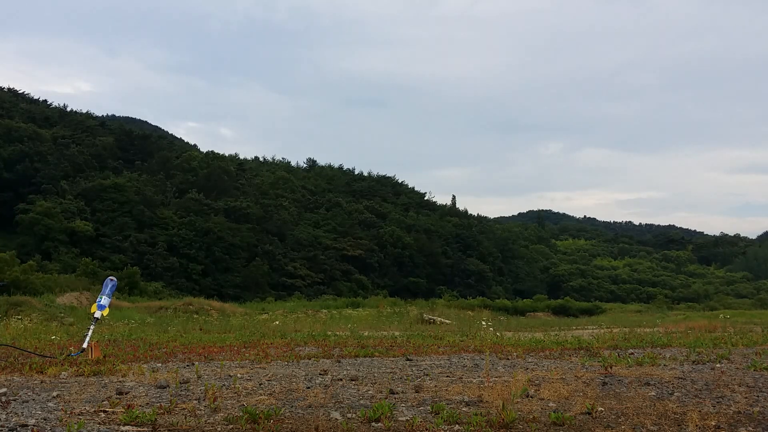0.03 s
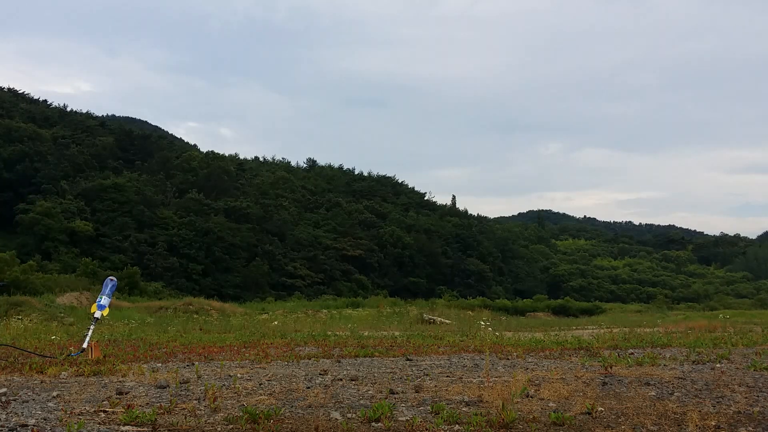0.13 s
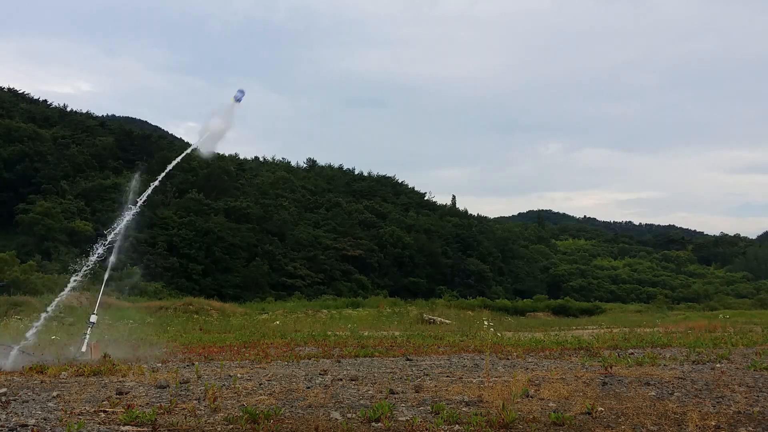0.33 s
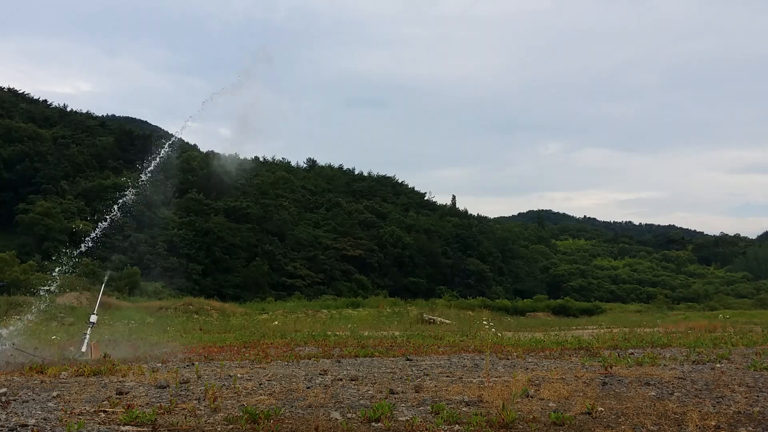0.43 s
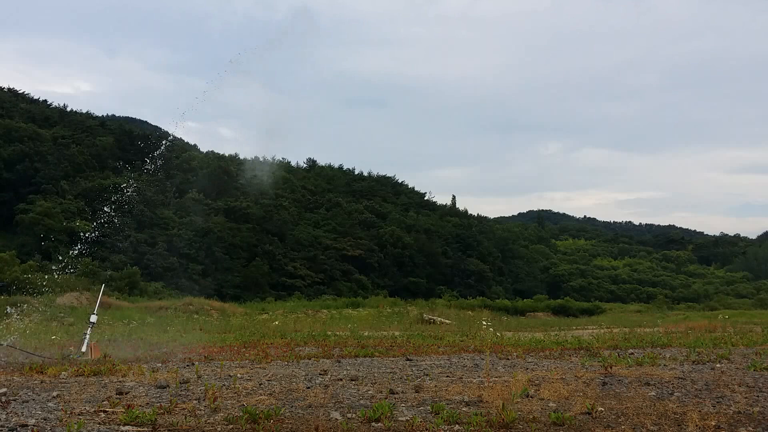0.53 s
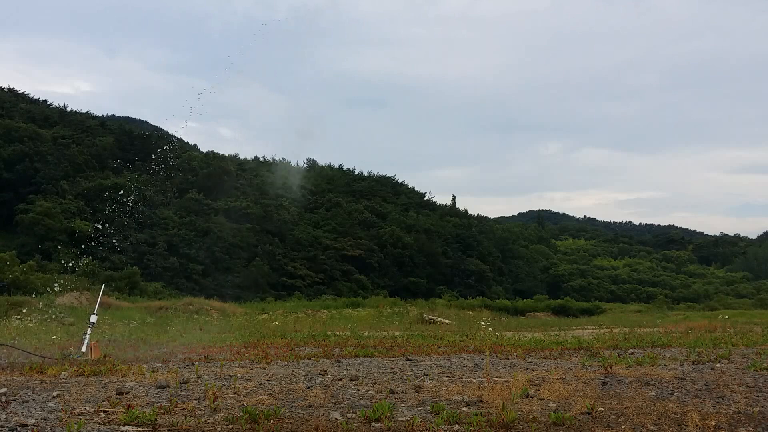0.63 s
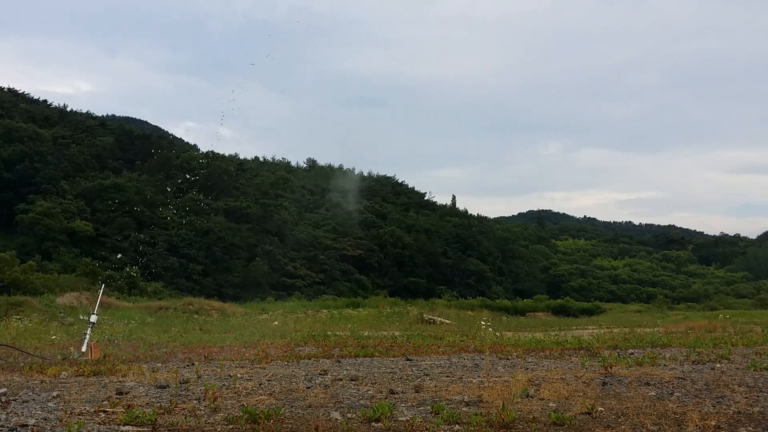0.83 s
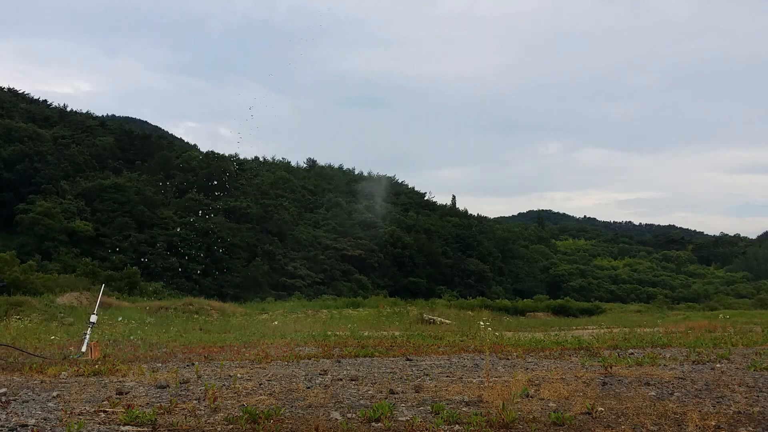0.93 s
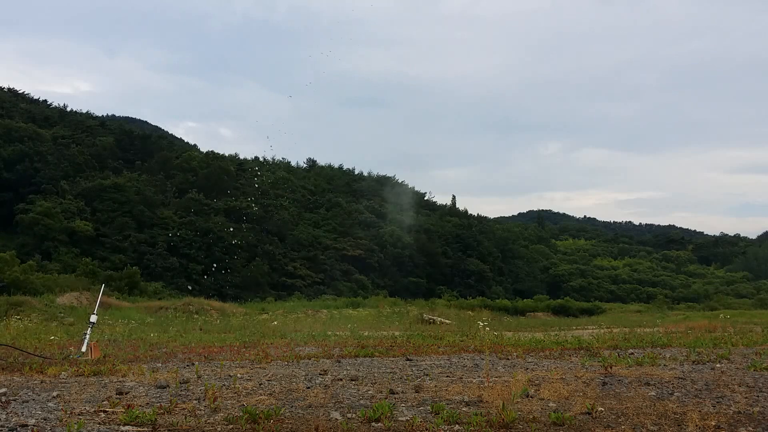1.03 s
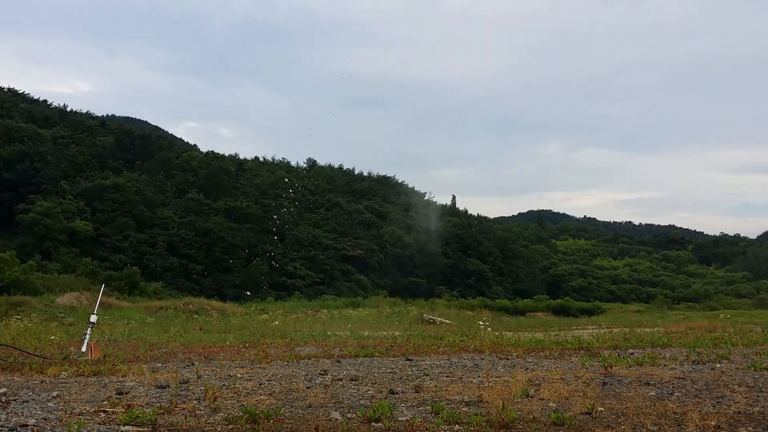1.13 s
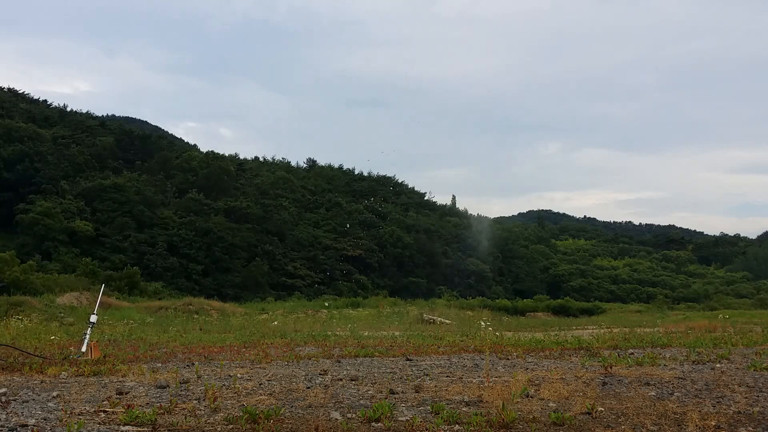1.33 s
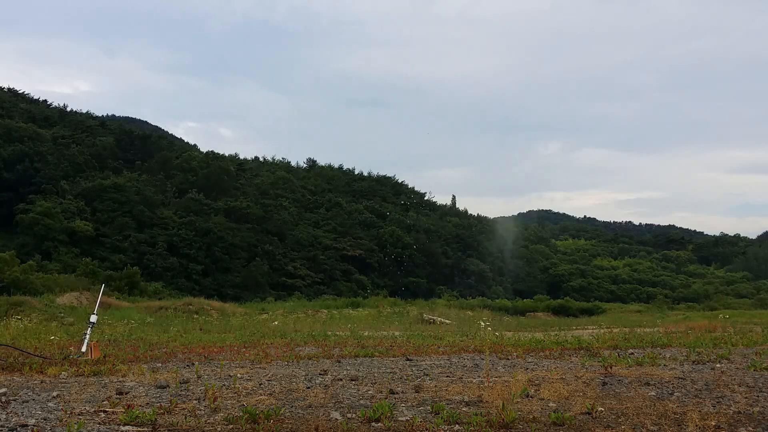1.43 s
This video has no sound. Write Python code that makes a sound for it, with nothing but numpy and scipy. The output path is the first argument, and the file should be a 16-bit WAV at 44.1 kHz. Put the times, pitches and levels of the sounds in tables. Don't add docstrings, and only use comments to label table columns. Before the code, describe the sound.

After a brief quiet of light wind and insects, a water rocket snaps loose and blasts away in a hiss; spray fades quickly into the open field, with low wind thuds buffeting the nearby stereo microphone.

```python
import sys
import numpy as np
from scipy import signal
from scipy.fft import rfft, irfft, next_fast_len
from scipy.io import wavfile
from scipy.ndimage import map_coordinates

SR = 44100
rng = np.random.default_rng(int(sys.argv[2]) if len(sys.argv) > 2 else 0)


def materialize(psi):
    bounded = np.clip(np.atleast_2d(psi).T, -1, 1)
    quanta = np.round(bounded * 32767).astype(np.int16)
    wavfile.write(sys.argv[1], SR, quanta)


def level_to_linear(level):
    exponent = np.asarray(level, float) / 20
    return 10 ** exponent


N = 66150
TIME_S = np.arange(N) / SR


def since(start_s):
    return np.maximum(TIME_S - start_s, 0)


def unit(x):
    return x / np.sqrt(np.mean(x ** 2) + 1e-20)


def along(points, hz):
    f, v = np.transpose(points)
    return np.interp(np.log(hz + 1), np.log(f + 1), v)


def curve(points):
    s, v = np.transpose(points)
    return np.interp(TIME_S, s, v)


def wobble(rate_hz):
    knots = rng.standard_normal(int(N * rate_hz / SR) + 4)
    return map_coordinates(knots, [np.arange(N) * rate_hz / SR])


def filtered(x, response):
    m = next_fast_len(N + 8192)
    return irfft(rfft(x, m) * response(np.fft.rfftfreq(m, 1 / SR)), m)[..., :N]


def shaped(x, spectrum):
    return unit(filtered(x, lambda hz: level_to_linear(along(spectrum, hz))))


def noise(spectrum, channels=1):
    return shaped(rng.standard_normal((channels, N)), spectrum)


def peak(hz, centre_hz, width_hz):
    return 1j * hz * width_hz / (centre_hz ** 2 - hz ** 2 + 1j * hz * width_hz)


def panned(left_over_right_db):
    return level_to_linear(np.array([[left_over_right_db / 2], [-left_over_right_db / 2]]))


def arrive(x, lead_s):
    return filtered(x, lambda hz: np.exp(1j * np.pi * hz * lead_s * np.array([[1], [-1]])))


def wide(spectrum):
    scatter_db, scatter_hz = -5, 6500
    own = filtered(noise(spectrum, channels=2),
                   lambda hz: level_to_linear(scatter_db) * hz ** 4 / (hz ** 4 + scatter_hz ** 4))
    return unit(noise(spectrum) + own)


def whiff(s, length_s, db, centre_hz, width_hz):
    tone = filtered(rng.standard_normal(N), lambda hz: peak(hz, centre_hz, width_hz) ** 2)
    return level_to_linear(db) * np.exp(-((TIME_S - s) / length_s) ** 2) * unit(tone)


def air():
    # [f/Hz, level/dB per Hz]
    rustle = [(150, -4), (300, 1), (700, -5.5), (1500, -10.5), (2500, -11), (6000, -12), (9500, -21),
              (15800, -16.5)]
    # [f/Hz, correlation]
    likeness = [(60, -0.097), (240, 0.41), (950, 0.25), (3770, 0.0071), (15000, -0.24)]
    # [t/s, level/dB]
    breeze = [(0, -59.5), (.3, -57.5), (.7, -64), (1.05, -65), (1.35, -57.5), (1.5, -59.5)]

    def mid_side(hz):
        turn = np.arccos(np.clip(along(likeness, hz), -1, 1)) / 2
        return np.array([np.cos(turn), np.sin(turn)])

    mid, side = filtered(noise(rustle, channels=2), mid_side)
    return level_to_linear(curve(breeze) + 2.1 * wobble(11.95)) * np.array([mid + side, mid - side])


def insects():
    # [t/s, level/dB]
    swell = [(0, -56.5), (.2, -53), (.6, -63), (1.06, -61.5), (1.3, -56.5), (1.5, -54)]
    # [f/Hz, level/dB per Hz]
    sizzle = [(3500, -58), (5000, -10), (6000, 1.5), (6600, 2.5), (7400, -7), (8500, -7.5), (10000, -37)]
    # [f/Hz, level/dB per Hz]
    buzz = [(6500, -53), (7600, 7), (8100, 14), (8700, -18), (10000, -30)]
    # [t/s, length/s, level/dB]
    chirps = [
        (-.03, 0.078, -67),
        (1.196, 0.094, -68),
    ]
    level_db = curve(swell)
    left = level_to_linear(level_db + 0.67 * wobble(39.9)) * level_to_linear([[0], [-27]]) * noise(sizzle, channels=2)
    right = level_to_linear(level_db - 12 + 2.0 * wobble(30.7)) * level_to_linear([[-6], [0]]) * noise(buzz, channels=2)
    gate, ramp_s = np.zeros(N), .015
    for s, length_s, db in chirps:
        gate += level_to_linear(db) * np.clip(np.minimum(TIME_S - s, s + length_s - TIME_S) / ramp_s, 0, 1)
    cricket = gate * np.sin(2 * np.pi * 3315 * TIME_S + 0.49 * wobble(59.6))
    return left + right + panned(-1) * cricket


def wind():
    # [f/Hz, level/dB per Hz]
    rumble = [(12, -60), (20, -3), (80, -0.5), (118, -6.5), (173, -8), (288, -25.5), (449, -32.5),
              (500, -25.5), (650, -62), (1100, -120)]
    # [t/s, level/dB]
    gust = [(0, 2), (.5, 0), (.9, -1), (1.05, -6), (1.15, 0), (1.5, 1)]
    # [t/s, peak level/dB, f/Hz, length/s]
    left_puffs = [(0.024, -36.5, 72.5, 0.03), (0.054, -42.5, 92, 0.088), (0.09, -29.5, 108.6, 0.023),
                  (0.13, -35, 84, 0.015), (0.175, -35.5, 79, 0.018), (0.199, -34.5, 94, 0.0077),
                  (0.399, -34, 97, 0.008), (0.437, -44, 88, 0.016), (0.464, -39.5, 97, 0.012),
                  (0.491, -42, 93, 0.028), (0.531, -43, 105, 0.0089), (0.608, -28.5, 127.6, 0.013),
                  (0.632, -34.5, 124, 0.0066), (0.679, -33.5, 90.5, 0.022), (0.717, -39, 142, 0.0088),
                  (0.887, -35, 113, 0.014), (1.133, -36.5, 92, 0.009), (1.235, -43, 82.5, 0.017),
                  (1.332, -34.5, 77, 0.022), (1.363, -38, 80.4, 0.013), (1.408, -34.5, 106, 0.021),
                  (1.45, -32.5, 58.6, 0.016)]
    # [t/s, peak level/dB, f/Hz, length/s]
    right_puffs = [(0.102, -42, 98, 0.031), (0.149, -34, 91, 0.011), (0.188, -42.5, 121, 0.018),
                   (0.394, -42, 99, 0.016), (0.692, -48, 66, 0.027), (0.801, -41.5, 104, 0.03),
                   (0.893, -45, 83, 0.012), (0.951, -42, 85, 0.015), (1.006, -48, 77, 0.017),
                   (1.189, -41, 86, 0.02), (1.478, -44.5, 75.5, 0.035)]
    wind_db, lump_db, lump_rate_hz, puff_rough_db = -53, 4, 7.94, -7.5
    lumps = level_to_linear(lump_db * np.array([wobble(lump_rate_hz), wobble(lump_rate_hz)]))
    rough = level_to_linear(puff_rough_db) * noise(rumble, channels=2)
    puffs = np.zeros((2, N))
    for port, rows in enumerate((left_puffs, right_puffs)):
        for s, db, hz, length_s in rows:
            u = TIME_S - s
            thud = np.cos(2 * np.pi * hz * u + np.pi * (.5 + rng.random())) + rough[port]
            puffs[port] += level_to_linear(db) * np.exp(-2 * (u / length_s) ** 2) * thud
    return puffs + level_to_linear(wind_db + curve(gust)) * unit(lumps * noise(rumble, channels=2))


def taps():
    # [t/s, level/dB, f/Hz, left over right/dB]
    blips = [(1.174, -48, 960, -7), (1.26, -48, 398, -7), (1.284, -41, 390, -4), (1.359, -44, 910, -8),
             (1.374, -52, 900, -8), (1.445, -35.5, 530, -2), (.716, -43, 244, 19.5),
             (0.883, -43.5, 234, 12.5), (0.226, -34.5, 101.5, 9), (0.265, -33.5, 90, 10),
             (0.297, -33.5, 80, 10.5), (0.352, -28, 90, -3), (0.288, -26, 190, -2), (0.445, -44, 290, 0),
             (0.1, -50, 280, 6)]
    cycles, out = 1.58, np.zeros((2, N))
    for s, db, hz, pan_db in blips:
        turns = since(s) * hz
        envelope = (1 - np.exp(-8 * turns)) * np.exp(-2 * turns / cycles)
        out += panned(pan_db) * level_to_linear(db) * np.sin(2 * np.pi * turns) * envelope
    return out


def ticks():
    # [t/s, level/dB]
    drops = [(.387, -30), (.5172, -41), (.546, -43), (0.5602, -41), (0.5612, -42), (.589, -43), (.596, -46),
             (.663, -45.5), (1.376, -52)]
    # [f/Hz, level/dB per Hz]
    spectrum = [(2000, -12), (4300, 2), (9000, -3.5), (12000, -10), (15800, -18)]
    t60_s = .012
    envelope = sum(level_to_linear(db - 60 * since(s) / t60_s) * (TIME_S > s) for s, db in drops)
    return envelope * noise(spectrum)


def flare():
    # t/s, length/s, level/dB, f/Hz, width/Hz
    swell = (.55, .018, -50, 800, 260)
    return whiff(*swell)


def whistle():
    # t/s, length/s, level/dB, f/Hz, width/Hz
    swell = (.32, .007, -37, 3050, 260)
    return whiff(*swell)


def hum():
    # [t/s, level/dB]
    fly_off = [
        (.492, -62),
        (.503, -51),
        (.55, -45.5),
        (.585, -50.5),
        (.61, -67.5),
    ]
    # [f/Hz, width/Hz, level/dB]
    bottle = [(572, 148, 2), (740, 340, -8), (339.5, 85, -6)]
    tone = filtered(rng.standard_normal(N),
                    lambda hz: sum(level_to_linear(db) * peak(hz, c, w) ** 2 for c, w, db in bottle))
    sounding = (TIME_S > fly_off[0][0]) * (TIME_S < fly_off[-1][0])
    return unit(tone) * level_to_linear(curve(fly_off) + 1.5 * wobble(50.8)) * sounding


def blast():
    # [peak t/s, level/dB, rise/s, fall/s], each time to -10 dB
    swells = [
        (.358, -22, .019, .013),
        (.363, -21, .012, .013),
    ]
    # [f/Hz, level/dB per Hz]
    roar = [(80, -23), (300, -2), (430, 1), (750, -14), (1000, -7.5), (1300, -10), (1800, 0), (2300, -4),
            (3500, -14), (8000, -27)]
    # [f/Hz, level/dB per Hz]
    hiss = [(800, -13), (2000, -8.5), (4500, -1.5), (6500, -7.5), (8500, -10.5), (11000, -10), (15800, -31)]
    ragged_db, out = 2, 0
    for (s, db, rise_s, fall_s), spectrum in zip(swells, (roar, hiss)):
        u = TIME_S - s
        bell_db = -10 * (np.abs(u) / np.where(u < 0, rise_s, fall_s)) ** 2
        out = out + level_to_linear(db + bell_db + ragged_db * wobble(350)) * wide(spectrum)
    return out


def jet():
    # [t/s, flow/dB]
    flow_points = [(.222, -61), (.232, -37), (.29, -33.5), (.312, -33.5), (.345, -32), (.41, -36.5),
                   (.46, -44.5), (.58, -47.5), (.66, -54)]
    # [f/Hz, level/dB per Hz]
    spray_spectrum = [(150, -5), (400, -1.5), (1500, -5), (3500, -3.5), (6500, 0.5), (8500, -5),
                      (11000, -11), (15800, -9.5)]
    # [f/Hz, level/dB per Hz]
    splash = [(120, -25), (300, 1.5), (800, -2.5), (1500, -15), (3000, -21), (5000, -33)]
    fade_db_per_s, drops_per_s, drops_share, drop_spread_db = 19, 3000, 0.22, 3
    splash_db, splash_end_s, splash_fall_s = -38.5, 0.297, 0.0055
    spread_s, spread_takes_s, lead_s = .32, .05, .000155

    fade_db = fade_db_per_s * since(flow_points[-1][0])
    flow = level_to_linear(curve(flow_points) - fade_db + 0.95 * wobble(91.5))
    sizes = level_to_linear(drop_spread_db * np.minimum(rng.exponential(size=(2, N)), 2))
    drops = (rng.random((2, N)) < drops_per_s / SR) * rng.standard_normal((2, N)) * sizes
    crackle = shaped(drops, spray_spectrum)
    hiss = noise(spray_spectrum, channels=2)
    spray = np.sqrt(1 - drops_share) * hiss + np.sqrt(drops_share) * crackle

    slap_db = splash_db + 1.9 * wobble(72.5) - 10 * since(splash_end_s) / splash_fall_s
    slap = level_to_linear(slap_db) * (TIME_S > flow_points[1][0]) * noise(splash)
    fan = np.clip((TIME_S - spread_s) / spread_takes_s, 0, 1) * np.pi / 2
    point = flow * np.cos(fan) * spray[0] + slap
    return flow * np.sin(fan) * spray + arrive(point, lead_s)


def click():
    s, db, width_s = .26478, -7, .00004
    return level_to_linear(db) * np.exp(-((TIME_S - s) / width_s) ** 2)


def crack():
    # [t/s, level/dB]
    pops = [
        (.245, -9),
        (.2643, 0),
    ]
    # [f/Hz, level/dB, t60/s, delay/s]
    modes = [(6400, 15, .0024, .0001), (720, -11, .012, .0004), (390, -7, .018, 0)]
    rise_s, out = .0012, np.zeros(N)
    for s, pop_db in pops:
        for hz, db, t60_s, delay_s in modes:
            u = since(s + delay_s)
            ring = np.sin(2 * np.pi * hz * u) * (1 - np.exp(-u / rise_s))
            out += level_to_linear(pop_db + db - 60 * u / t60_s) * ring
    return out


def snaps():
    # [t/s, level/dB, t60/s, thump over snap/dB]
    bursts = [(.228, -32, .2, -12), (.2318, -18, .012, -26), (.2356, -16, .016, -24), (.245, -9, .004, -20),
              (.2472, -17, .012, -10), (.254, -26, .04, -12), (.2644, -6, .004, -14),
              (.2658, -14, .035, -14), (.2722, -20, .012, -18), (.2845, -27, .012, -8), (.334, -36, .012, 6),
              (.341, -34, .012, 6), (.3588, -13, .006, -10)]
    # [f/Hz, level/dB per Hz]
    spectrum = [(150, -2), (1200, -15), (2700, -11), (3200, -20), (4000, -20), (4500, 0.5), (6000, -3.5),
                (8500, 0), (15800, -9.5)]
    rise_s, thump_hz, thump_width_hz, thump_t60_s = .0004, 560, 930, 0.023
    bright, push = np.zeros(N), np.zeros(N)
    for s, db, t60_s, thump_db in bursts:
        u = since(s)
        bright += level_to_linear(db - 60 * u / t60_s) * (1 - np.exp(-u / rise_s))
        push += level_to_linear(db + thump_db + 14.5 - 60 * u / thump_t60_s) * (u > 0)
    thump = filtered(push * rng.standard_normal(N),
                     lambda hz: peak(hz, thump_hz, thump_width_hz) ** 2)
    return bright * wide(spectrum) + thump


def field(x):
    # [f/Hz, left over right/dB]
    lean = [(300, -3), (2500, -1.5), (3600, 0), (4500, 1.5), (6500, 7), (7500, -3.5), (8500, -11.5),
            (11000, -4.5), (14000, -1)]
    tail_db, t60_s = -27, .15
    t = np.arange(SR // 4) / SR
    tail = rng.standard_normal((2, len(t))) * level_to_linear(-60 * t / t60_s)
    tail /= np.linalg.norm(tail[0])
    wet = x + level_to_linear(tail_db) * signal.fftconvolve(x, tail, axes=1)[:, :N]
    return filtered(wet, lambda hz: panned(along(lean, hz)[None, :]).reshape(2, -1))


def scene():
    stand_lead_s, airborne_lead_s = .000137, .000073
    background = air() + insects() + wind() + taps()
    near = ticks() + flare() + whistle() + click()
    rocket = arrive(snaps() + crack(), stand_lead_s) + arrive(blast() + hum(), airborne_lead_s) + jet()
    return background + near + field(rocket)


def low_pass(x):
    return signal.sosfilt(signal.butter(12, 15750, fs=SR, output="sos"), x)


def record(dry):
    low_hz, top_hz = 35, 15750
    mix = filtered(dry, lambda hz: (hz < top_hz) * 1j * hz / (low_hz + 1j * hz))
    return low_pass(mix)


dry = scene()
out = record(dry)
materialize(out)
```